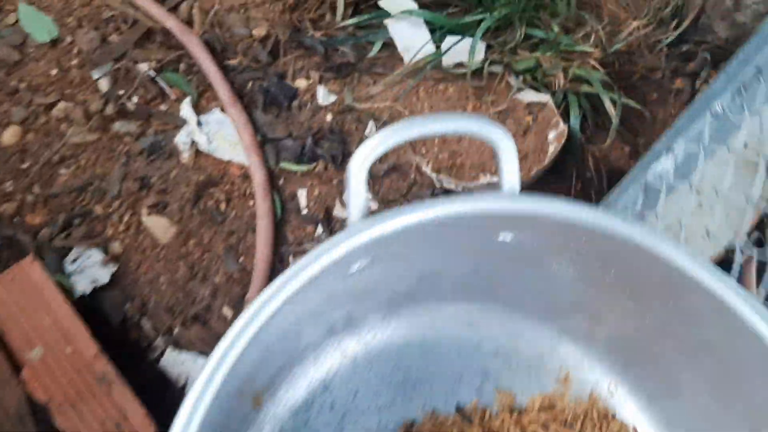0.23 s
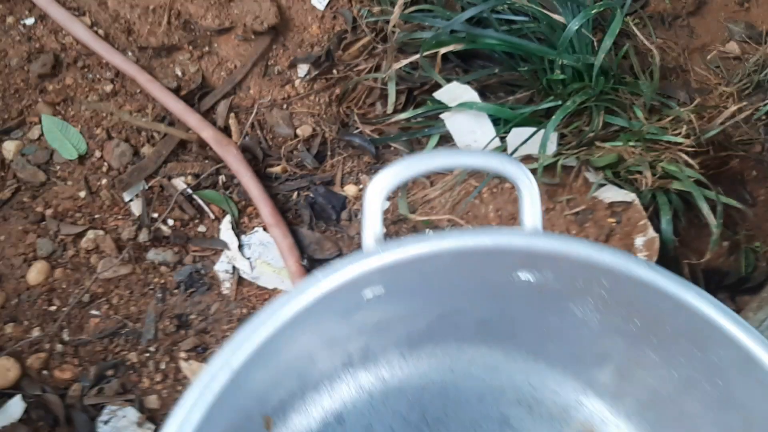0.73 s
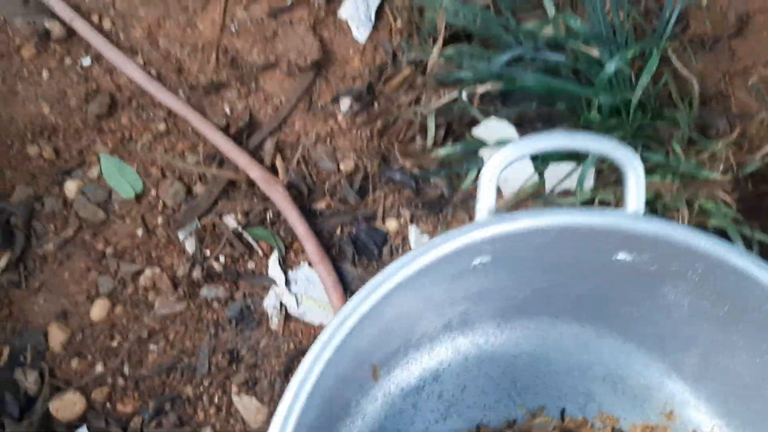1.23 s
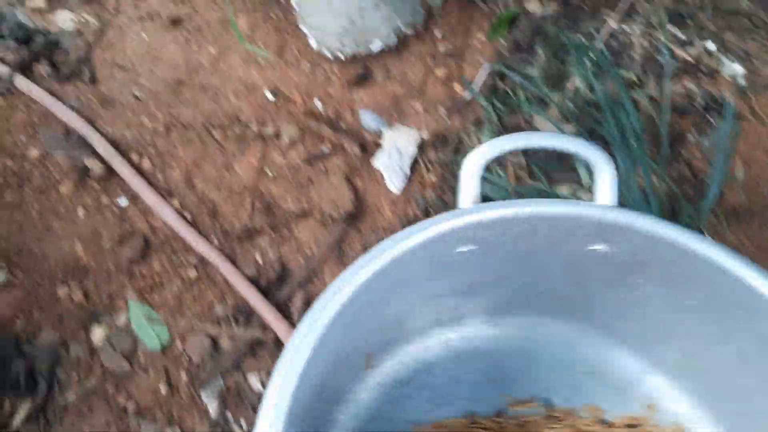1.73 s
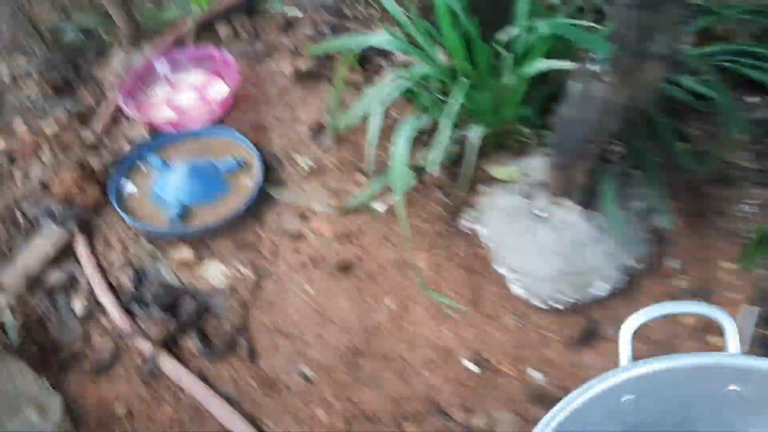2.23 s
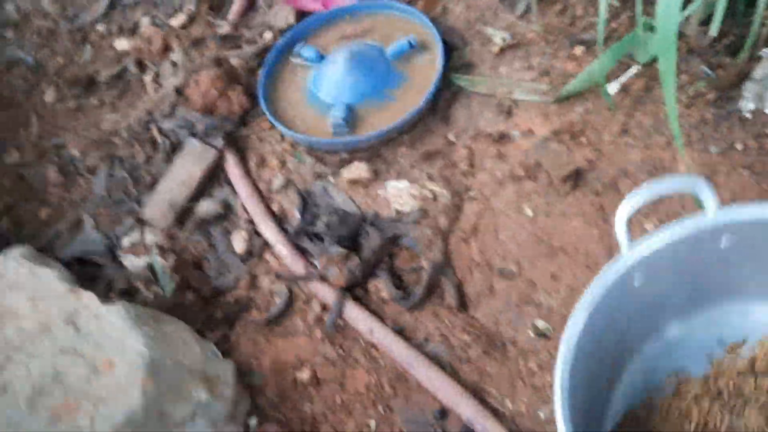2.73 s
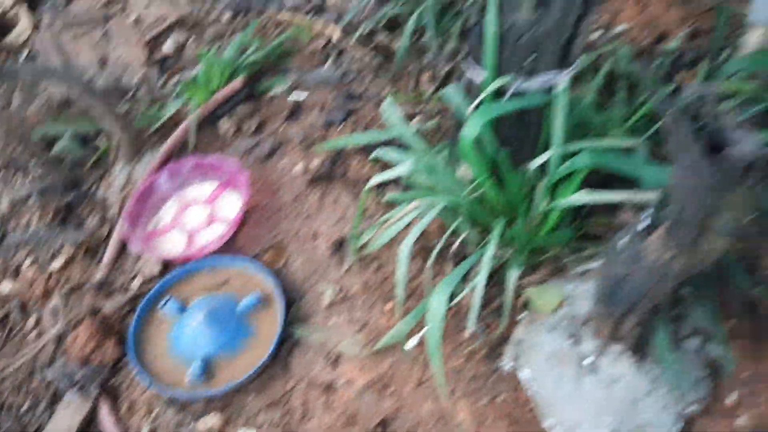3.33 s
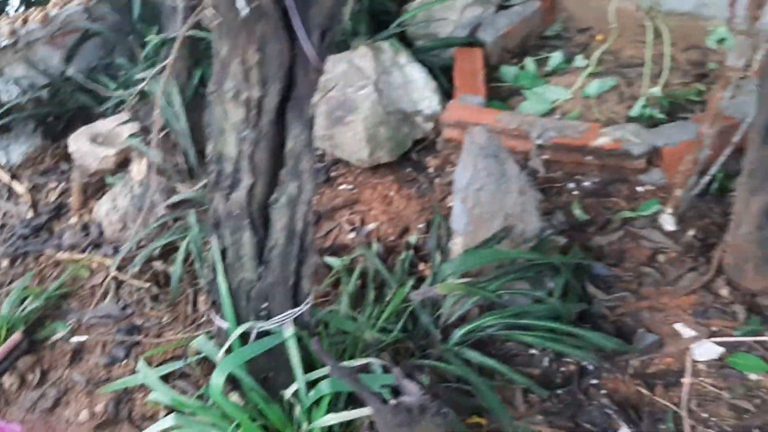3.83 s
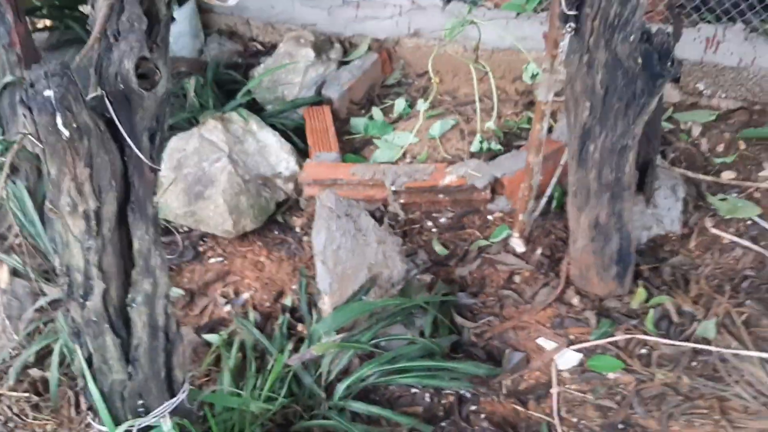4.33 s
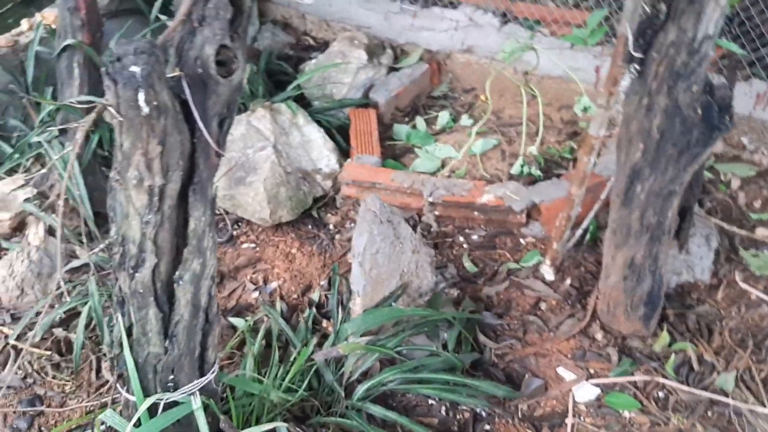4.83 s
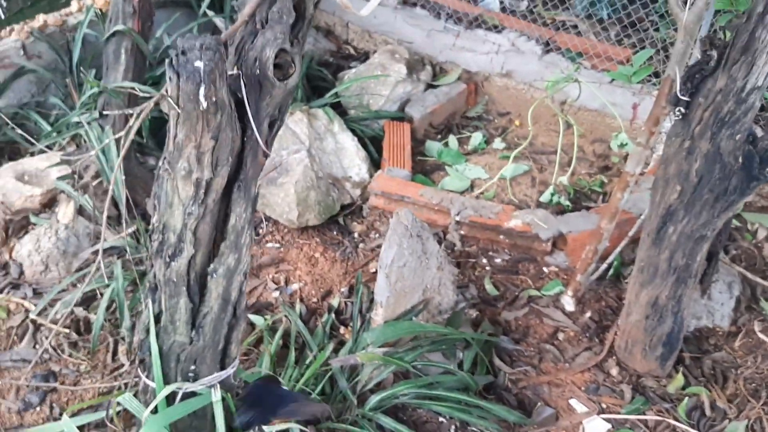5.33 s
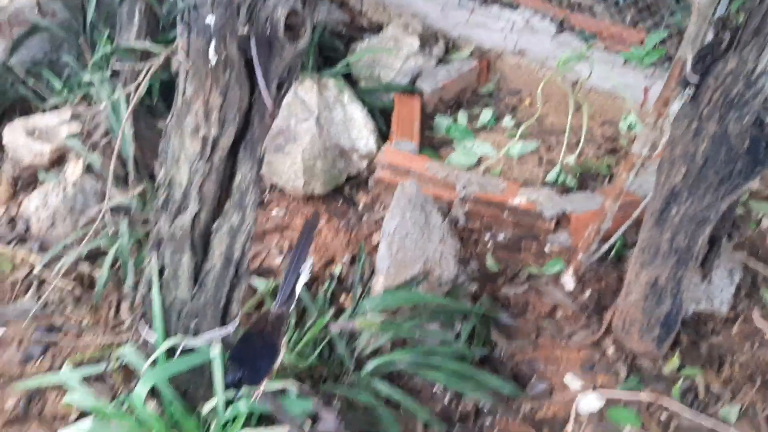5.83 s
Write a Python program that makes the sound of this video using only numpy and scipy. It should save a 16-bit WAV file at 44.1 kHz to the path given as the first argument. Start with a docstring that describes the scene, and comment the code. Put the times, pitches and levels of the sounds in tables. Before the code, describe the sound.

Metallic pan knocks, sliding grain and gritty footsteps over a constant high insect trill, with distant roosters, bird chirps and a brief feathery flutter.

```python
"""From the start a garden trills with insects over a low traffic hum; far roosters call, birds chirp
and grain slides faintly. Knocks on an aluminium pan of grain begin at half a second; then feet scuff
gritty soil and grain spills. The hardest knock comes near 2.8 s, with a hollow drone round it.
After 4.3 s a far bird whistles, and near 5.3 s a bird flaps down into the plants.
Clicks or noise through filters make insects, grain, feathers and traffic; sine waves make calls and rings."""
import sys
import numpy as np
from scipy import signal
from scipy.fft import rfft, irfft, next_fast_len
from scipy.io import wavfile
from scipy.ndimage import uniform_filter1d, map_coordinates

SR = 44100
rng = np.random.default_rng(int(sys.argv[2]) if len(sys.argv) > 2 else 0)


def wrap_up_sound(samples):
    """Save the sound to the file named by the first command line argument, as 16-bit audio."""
    columns = np.atleast_2d(samples).T
    # keep every value between -1 and 1, then stretch to whole-number steps
    tamed = np.clip(columns, -1, 1)
    steps = np.round(tamed * 32767).astype(np.int16)
    wavfile.write(sys.argv[1], SR, steps)


N = 268657
TIME = np.arange(N) / SR


def amp(db):
    """Turn decibels into a gain."""
    return 10 ** (np.asarray(db) / 20)


def unit(x):
    """Scale to an average strength (rms) of 1."""
    return x / np.sqrt(np.mean(x ** 2))


def curve(rows, axis=1):
    """Join one column of a table by straight lines in time."""
    rows = np.array(rows)
    return np.interp(TIME, rows[:, 0], rows[:, axis])


def colour(x, points):
    """Filter through (f/Hz, gain/dB) points; the filter answers only after the sound arrives."""
    n = 2 * next_fast_len(x.shape[-1] // 2 + 1024)
    hz, db = np.transpose(points)
    bins_hz = np.arange(n // 2 + 1) * SR / n
    gain_db = np.interp(np.log(bins_hz + 1), np.log(hz), db)
    # folding the cepstrum forward in time gives the minimum-phase filter
    cepstrum = irfft(np.log(amp(gain_db)))
    cepstrum[1:n // 2] *= 2
    cepstrum[n // 2 + 1:] = 0
    response = np.exp(rfft(cepstrum))
    return irfft(rfft(x, n) * response)[..., :x.shape[-1]]


def walk(rate):
    """Random wandering with a spread near 1, through `rate` new values a second."""
    knots = rng.standard_normal(1024)
    return np.interp(TIME * rate, np.arange(len(knots)), knots)


def swell(s, rise_db_s, fall_db_s):
    """Gain that grows to 1 at time s and dies away."""
    return amp(np.minimum(rise_db_s * (TIME - s), fall_db_s * (s - TIME)))


def pan(db):
    """Left and right gains for a left-minus-right level difference."""
    return amp(np.array([[db], [-db]]) / 2)


def place(x, db, lag_ms):
    """Put a source to one side by a level difference and a left delay (negative: left comes earlier)."""
    left = np.roll(x[0], int(round(lag_ms * SR / 1000)))
    return np.array([left, x[1]]) * pan(db)


def pair(n, apart):
    """Stereo noise: a part shared by both channels and a part of their own."""
    shared = rng.standard_normal(n)
    own = rng.standard_normal((2, n))
    return unit(shared + apart * own)


def add(out, s, x):
    """Mix x into out from time s."""
    i = max(int(s * SR), 0)
    out[:, i:i + x.shape[-1]] += x[..., :N - i]


def garden(x, t60):
    """Echo scattered by walls, trunks and leaves, different in each channel; it drops 60 dB in t60 seconds."""
    t = TIME[:SR]
    after_gap = t > .004
    scatter = pair(SR, 5.4) * amp(-60 * t / t60) * after_gap
    response = unit(scatter) / np.sqrt(SR)
    return signal.fftconvolve(np.atleast_2d(x), response, axes=-1)[:, :N]


def knock(db, bass_db, treble_db, rattle_db):
    """A sharp crack, a short rattle of loose grain, and the damped ring of the pan."""
    # ways the loaded pan rings: f/Hz, level/dB, time to drop 60 dB/s
    pan_modes = [(406, -9.5, 0.075), (425, -18.5, 0.21), (899, 6, 0.12), (950, 7, 0.056),
                 (1015, -33.5, 0.09), (1460, 9, 0.03), (1570, -8.5, 0.035), (2730, 1.5, 0.13),
                 (3660, -4, 0.24), (4500, -8.5, .12), (6690, 12.5, 0.097), (7260, 10.5, 0.033)]
    t = TIME[:SR // 4]
    contact = (1 - np.exp(-t / .0003)) * np.exp(-t / .0018)
    rattle = amp(rattle_db + 1.5) * np.exp(-t / 0.011)
    crack = pair(len(t), 1.0) * (contact + rattle)
    ring = np.zeros(len(t))
    for hz, mode_db, t60 in pan_modes:
        ring += amp(mode_db - 60 * t / t60) * np.sin(2 * np.pi * hz * t + rng.uniform(0, 2.5))
    tone = [(70, bass_db - 18.5), (370, bass_db + 12), (620, bass_db / 2 - 2.5),
            (850, 3.5), (1300, 2), (1700, 3.3),
            (2200, treble_db / 4 - 1), (2600, treble_db / 4), (2950, treble_db / 2 + 5),
            (4800, treble_db + 3.0), (7900, treble_db + 1), (8600, treble_db - 8.0),
            (12000, treble_db - 6), (15500, treble_db - 15.5)]
    return colour(unit(crack + amp(-41.5) * ring), tone) * amp(db - 11)


def taps():
    """Knocks set the pan ringing, each with its own balance between left and right."""
    # knocks, before knock() shapes and lowers them:
    # t/s, level/dB, bass against middle/dB, treble against middle/dB, left minus right/dB, rattle/dB
    knocks = [(0.519, -42.5, -3, -8, -2, -5), (0.674, -50.5, -9, -14, -7, -12.5),
              (0.816, -36, -16, -3, -6, 8), (0.971, -40.5, -4, -16, -2, -25),
              (0.993, -35, -25, -11, -2, -41), (1.207, -40, -7.5, 0.5, 0, -4),
              (1.767, -37.5, -9.5, -1.5, -2, -35), (2.026, -25, -13.5, -16.5, 0, -29),
              (2.128, -37.5, -33, -14, 7, 10), (2.201, -37.5, -51, -18.5, -0.5, -23),
              (2.377, -33, -11, -18, -3.5, -24), (2.807, -15, -20.5, -5, -3.5, -18),
              (2.819, -36, -20, -10, -3, -13), (2.855, -26.5, -12, -19, -4.5, -27),
              (3.388, -50, 15, -30, 0, -23), (3.403, -38.5, -1, -22, 1, -19),
              (4.937, -41.5, -31, -2, -3, 16), (5.283, -47.5, -21, 6.5, -9, -6)]
    out = np.zeros((2, N))
    for s, db, bass_db, treble_db, pan_db, rattle_db in knocks:
        add(out, s, place(knock(db, bass_db, treble_db, rattle_db), pan_db, 0.13))
    return out


def ticks(count):
    """Stray grains hit the pan lightly at random moments while it is carried."""
    first_s, last_s = .5, 3.9
    mean_db, spread_db = -47, 2.5  # before knock() lowers them
    out = np.zeros((2, N))
    for s in rng.uniform(first_s, last_s, size=count):
        db = mean_db + spread_db * rng.standard_normal()
        add(out, s, knock(db, bass_db=-19, treble_db=-8.5, rattle_db=-22))
    return out * pan(-2.9)


def grit(spread_db):
    """Dense tiny contacts: noise whose strength jumps every 32 samples."""
    sizes = amp(spread_db * rng.exponential(size=N // 32 + 1))
    strength = np.repeat(np.minimum(sizes, 7), 32)[:N]
    return pair(N, 1.4) * strength


def spill():
    """Many seeds land on metal within a few milliseconds and leave a thin ring of two close tones."""
    # colour of grain striking metal: f/Hz, gain/dB
    spill_tone = [(500, -25), (2200, -19), (3200, -4), (5000, -3), (8100, 1), (8900, -10), (11200, -4),
                  (13000, -9), (15500, -7)]
    start_s, length_s = .888, 0.012
    out, t = np.zeros((2, N)), TIME[:SR // 2]
    shower = np.exp(-np.maximum(t - length_s, 0) / 0.0064) + 0.094 * np.exp(-t / 0.014)
    tones = np.sin(2 * np.pi * 11060 * t) + .8 * np.sin(2 * np.pi * 10935 * t)
    ring = amp(-26 - 60 * t / .4) * tones
    seeds = unit(colour(grit(1.0)[:, :len(t)], spill_tone))
    add(out, start_s, (seeds * shower + amp(4.5) * ring) * amp(-27.5) * pan(-9))
    return out


def bumps():
    """Soft handling bumps and the pan's low ring at the hardest knock, as short low sines, over a drone."""
    # bumps and low rings, all lifted by 1.5 dB below: t/s, f/Hz, level/dB, time to drop 60 dB/s
    low_sines = [(1.215, 133, -47, 0.13), (1.948, 502, -39, 0.034), (2.029, 141, -37.5, 0.067),
                 (2.056, 283, -33, 0.031), (2.31, 337, -34.5, 0.019), (2.377, 286, -37, 0.031),
                 (2.398, 332, -33.5, 0.017), (2.413, 346, -42, 0.029), (2.428, 262, -36, 0.031),
                 (2.808, 415, -26, 0.048), (2.814, 124, -39, 0.12), (2.857, 421, -30.5, 0.057),
                 (3.04, 108, -39, 0.072), (3.403, 360, -35.5, 0.032)]
    # the hollow drone, filtered noise, swells round the hardest knock and lingers faintly
    drone_s, rise_db_s = 2.873, 59.5
    main_swell = amp(-48) * swell(drone_s, rise_db_s, fall_db_s=135)
    linger = amp(-62) * swell(drone_s, rise_db_s, fall_db_s=16.5)
    hollow = [(200, -35), (370, -7), (470, 2.0), (540, -12), (700, -24.0), (1200, -51.5)]
    out = unit(colour(pair(N, .3), hollow)) * (main_swell + linger) * pan(-1.5)
    t = TIME[:SR // 4]
    soft_start = 1 - np.exp(-t / 0.00072)
    for s, hz, db, t60 in low_sines:
        add(out, s, amp(db + 1.5 - 60 * t / t60) * soft_start * np.sin(2 * np.pi * hz * t))
    return out


def rustle():
    """Grain slides in the pan all along; soles scuff in short swells; both are filtered grit."""
    # sliding grain, strongest while the pan is carried along; lifted by 2 dB below: t/s, level/dB
    slide_level = [(0, -66), (.9, -66), (1.9, -64.5), (2.6, -57), (3.2, -61), (3.65, -70.5), (4.0, -64.5),
                   (4.6, -75), (5.4, -65.5), (6.09, -74.5)]
    # colour of the sliding grain: f/Hz, gain/dB
    slide_tone = [(150, -10), (400, 12), (700, 8), (1200, 4), (2200, 2), (4000, 6), (7500, 3.5), (8800, 1),
                  (12500, 1), (15500, -1.5)]
    # scuffs of feet: t/s, length/s, level/dB, brightness/(dB per octave, roughly)
    scuffs = [(0.777, 0.17, -51, -2.5), (0.863, 0.24, -50.5, -1.5), (1.074, 0.098, -55, -2),
              (1.209, 0.06, -57, -3.5), (1.547, 0.33, -57.5, -1), (2.02, 0.16, -44.5, -1),
              (2.181, 0.21, -52.5, -1.5), (2.356, 0.21, -54, -2.5), (2.498, 0.59, -53, -2),
              (2.795, 0.11, -48, 3.5), (3.561, 0.37, -62, -1), (4.739, 0.28, -59, 2.5),
              (4.929, 0.12, -58, -0.5)]
    out = unit(colour(grit(2.2), slide_tone)) * amp(curve(slide_level) + 2.0) * pan(-1.5)
    contacts = grit(2.54) * amp(2.9 * walk(70))
    for s, length, db, slope in scuffs:
        stroke = contacts[:, int(s * SR):int((s + length) * SR)]
        u = np.linspace(0, 1, stroke.shape[-1])
        envelope = u ** 0.4 * (1 - u) ** 1.25
        tone = [(90, -6.5), (300, -2.5), (1300, 1.7 * slope), (7500, 5.7 * slope),
                (9000, 4.9 * slope - 4), (15000, 4.5 * slope - 5)]
        add(out, s, unit(colour(stroke * envelope, tone)) * amp(db) * pan(-0.42))
    return out


def wings():
    """Feathers brush air and leaves: one rounded swell of grit, pulsing with each wing beat."""
    # colour of the rustling feathers: f/Hz, gain/dB
    wings_tone = [(30, -31.5), (100, 1.5), (300, 7), (700, 5), (1300, 4), (2200, -1), (3300, 9),
                  (7500, 0.5), (8800, -0.5), (12500, 2), (15500, -14.5)]
    landing_s, spread_s, beat_hz = 5.3, .145, 27.2  # the swell is 20 dB down spread_s away from landing
    from_landing = TIME - landing_s
    beats = 1 + .4 * np.cos(2 * np.pi * beat_hz * from_landing)
    envelope = amp(-46 - 20 * (from_landing / spread_s) ** 2)
    return unit(colour(grit(2.4), wings_tone)) * beats * envelope * pan(-3.0)


def trill(rate_hz, jitter, spread, count):
    """Click trains of several insects, each at its own uneven rate and wandering loudness."""
    clicks = np.zeros(N)
    for _ in range(count):
        start = rng.random()
        rate = rate_hz * np.exp(spread * rng.standard_normal() + jitter * walk(60))
        phase = start + np.cumsum(rate) / SR
        # one click each time the phase passes a whole number
        clicks += np.diff(np.floor(phase), prepend=0) * amp(2 * walk(6.1))
    return clicks - clicks.mean()


def waver(x, depth_ms, rate):
    """Slow stretching of time makes the pitch drift slightly."""
    drift = uniform_filter1d(walk(rate), int(SR / rate))
    position = (TIME + drift * depth_ms / 1000) * SR
    return np.array([map_coordinates(c, [position], order=3) for c in x])


def insects():
    """Clicks ring each insect's sound organ; with distance they merge into a steady hiss."""
    # chorus of near insects, lifted by 2.5 dB below: t/s, level/dB
    chorus_level = [(0.0, -51), (1.54, -51.5), (2.3, -48), (2.8, -50), (2.97, -53), (3.65, -57.5),
                    (4.3, -52), (4.8, -49.5), (6.09, -50)]
    # resonance of the near insects' sound organs: f/Hz, gain/dB
    chorus_body = [(3300, -68.5), (3900, -34), (4000, -8.5), (4120, -9.5), (4220, 2), (4310, 4.5),
                   (4370, 3), (4450, -17), (4800, -19.5), (5600, -44), (7000, -70.5)]
    # a higher insect swells about once a second: t of the crest/s, level/dB
    shrill_crests = [(.52, -63), (1.5, -64), (2.65, -60.5), (3.87, -64.5), (5.03, -61.5), (6.06, -61)]
    # resonance of the higher insects: f/Hz, gain/dB
    shrill_body = [(5500, -46.5), (6600, -23), (7100, -2), (7350, -1), (7600, -4), (8100, -13),
                   (9000, -39.5)]
    # a crowd of further insects, spread over the near ones' pitch and above: f/Hz, gain/dB
    crowd_body = [(3850, -37), (4020, -1), (4600, -1.5), (4800, -2), (5120, -6), (5400, -13), (5900, -27.5),
                  (7000, -45)]
    # thin hiss of insects further off: f/Hz, gain/dB
    far_tone = [(1500, -23), (2500, -9.5), (3100, 2), (3700, 10.5), (5800, 0.5), (8800, -5), (10200, 3.5),
                (11100, 2.5), (11900, -12.5), (15500, -20.5)]
    nearest = amp(1.5) * trill(69.4, .07, 0, count=1)
    low = nearest + trill(72, .08, .25, count=2)
    high = trill(190, 0.089, .25, count=4)
    chorus = unit(colour(0.65 * low + garden(low, 0.096), chorus_body))
    chorus = waver(chorus, depth_ms=.6, rate=6) * amp(1.3 * walk(45))
    shrill = unit(colour(.3 * high + garden(high, 0.31), shrill_body))
    shrill = waver(shrill, depth_ms=1.5, rate=4)
    swells = [amp(db) * swell(s, rise_db_s=16.5, fall_db_s=35.5) for s, db in shrill_crests]
    effort = np.max(swells, axis=0)
    crowd = unit(colour(pair(N, 2), crowd_body)) * amp(-59 + walk(5))
    far = unit(colour(pair(N, 6.8), far_tone)) * amp(-65.5 + 2.1 * walk(2))
    near_chorus = place(chorus * amp(curve(chorus_level) + 2.5), -2.0, -0.42)
    return near_chorus + (shrill * effort + crowd + far) * pan(-1.2)


def note(length, hz, glide, rough):
    """One bird note: a sine on a slightly arched glide (octaves), with a rasp in its pitch."""
    u = np.linspace(-1, 1, int(length * SR))
    rasp = unit(uniform_filter1d(rng.standard_normal(len(u)), size=60))
    arch_octaves = .07
    pitch = hz * 2 ** (glide * u / 2 - arch_octaves * u ** 2) * (1 + rough * rasp)
    tone = np.sin(2 * np.pi * np.cumsum(pitch) / SR)
    return unit(tone * np.cos(np.pi * u / 2))


def birds():
    """Quick gliding notes; fainter chirps are further off, so rougher and with more echo."""
    # short bird notes: t/s, length/s, middle f/Hz, glide/octaves, level/dB
    chirps = [(0.056, 0.038, 1645, 0.46, -57), (0.076, 0.027, 2235, 0.22, -51),
              (0.338, 0.031, 2970, -0.51, -46), (0.393, 0.025, 3333, -.27, -33.5),
              (.408, 0.016, 2790, 0.17, -45), (0.419, 0.015, 3600, .03, -38),
              (0.433, 0.018, 3280, -.12, -32.5), (1.437, 0.028, 2610, -0.55, -46),
              (1.504, 0.027, 2634, 0.62, -42.5), (1.609, 0.027, 2796, 0.27, -41.5),
              (2.567, 0.031, 2150, .24, -37), (3.622, 0.031, 1836, 0.27, -51.5),
              (3.671, 0.019, 1885, -0.038, -41), (3.712, 0.026, 1722, -0.47, -53.5),
              (4.706, 0.046, 794, 0.31, -61.5)]
    # a far bird repeats one falling whistle: t/s, level/dB
    whistles = [(4.36, -66), (4.765, -59.5), (5.346, -50.5), (5.481, -65), (5.673, -53), (5.746, -57)]
    even_db, echo_slope = -50, 0.48  # chirp level with equal echo; dB more echo for each dB fainter
    notes = []
    for s, length, hz, glide, db in chirps:
        echo_db = echo_slope * (even_db - db)
        notes.append((s, note(length, hz, glide, .06 * amp(echo_db)), db, echo_db))
    for s, db in whistles:
        whistle = note(length=.072, hz=3420, glide=-0.362, rough=.07)
        notes.append((s, whistle, db, 10))  # 10 dB more echo than direct sound
    direct, sent = np.zeros((1, N)), np.zeros((1, N))
    for s, sound, db, echo_db in notes:
        heard = sound * amp(db) / np.hypot(1, amp(echo_db))
        add(direct, s, heard)
        add(sent, s, heard * amp(echo_db))
    return place(direct + garden(sent, .26), -4, -0.21)


def roosters():
    """Long wavering calls of two partials sag and fade, blurred and broken up by distance."""
    # calls, before fading and blurring: t/s, length/s, starting f/Hz, level/dB
    crows = [(0, 0.43, 680, -64), (.25, 0.42, 816.7, -57), (0.561, 0.77, 774, -59),
             (1.181, 0.67, 785, -61.5), (3.796, 0.22, 620, -62), (4.07, 0.23, 604, -63),
             (5.379, 0.48, 765, -70), (5.84, 0.24, 608, -72.5)]
    attack_s, release_s = 0.035, 0.058
    sag_octaves_s, fade_db_s, roughness = 0.19, 18.5, 0.0298
    calls = np.zeros((1, N))
    highest = max(row[2] for row in crows)
    for s, length, hz, db in crows:
        t = TIME[:int(length * SR)]
        pitch = hz * 2 ** (-sag_octaves_s * t) * (1 + roughness * walk(131.1)[:len(t)])
        phase = 2 * np.pi * np.cumsum(pitch) / SR
        # -7 dB at the highest call, 32 dB weaker for each octave lower
        overtone = amp(-7 + 32 * np.log2(hz / highest))
        edges = np.clip(np.minimum(t / attack_s, (length - t) / release_s), 0, 1)
        envelope = edges * amp(db - fade_db_s * t)
        add(calls, s, (np.sin(phase) + overtone * np.sin(2 * phase)) * envelope)
    calls = calls * amp(3 * walk(26))
    return (0.42 * calls + garden(calls, 0.44)) * pan(-1)


def traffic():
    """Low hum from far roads: filtered noise, nearly alike in both channels."""
    # distant traffic, lowered by 1.24 dB below: t/s, level/dB
    traffic_level = [(0.0, -53.5), (2.0, -52.5), (2.75, -51), (3.2, -55.5), (3.7, -61.5), (4.1, -59.5),
                     (5.4, -55.5), (6.09, -56.5)]
    # colour of the hum: f/Hz, gain/dB
    traffic_tone = [(25, -36), (50, -13.5), (80, -4.5), (110, 0.5), (140, 3.5), (165, 0), (195, -11),
                    (300, -14), (450, -30), (700, -24.5), (1100, -47), (2500, -56.5), (8000, -58)]
    hum = unit(colour(pair(N, 0.28), traffic_tone))
    return hum * amp(curve(traffic_level) - 1.24) * pan(-1.26)


def scene():
    """Near handling sounds, with a faint garden echo, over the living background."""
    near = taps() + spill() + ticks(count=7)
    handling = near + amp(-12) * garden(near, 0.19) + bumps() + rustle()
    return handling + wings() + insects() + birds() + roosters() + traffic()


def record(dry):
    """The phone thins the deepest bass and cuts the top."""
    bass_cut = signal.butter(2, 32, "highpass", fs=SR, output="sos")
    top_cut = signal.ellip(10, .2, 70, 15760, fs=SR, output="sos")
    thinned = signal.sosfilt(bass_cut, dry)
    return signal.sosfilt(top_cut, thinned)


dry = scene()
out = record(dry)
wrap_up_sound(out)
```